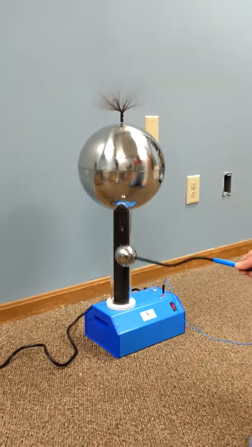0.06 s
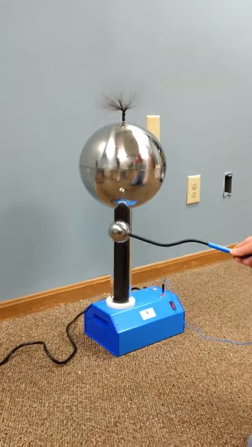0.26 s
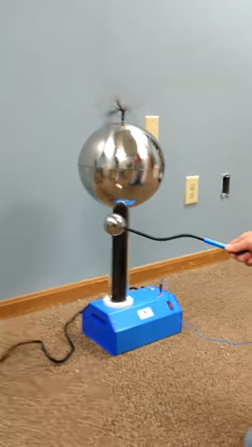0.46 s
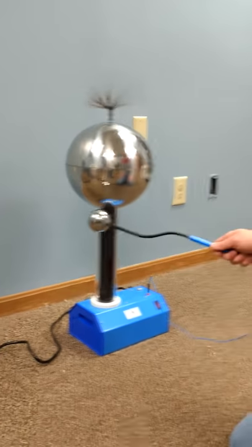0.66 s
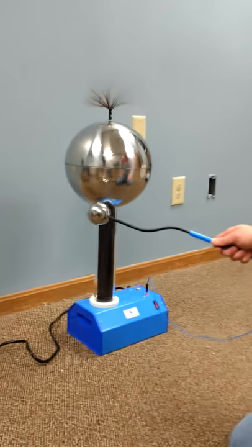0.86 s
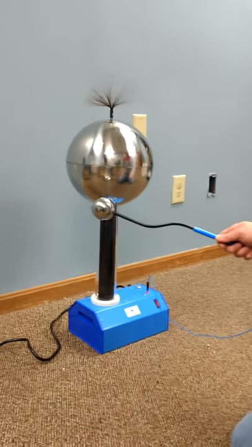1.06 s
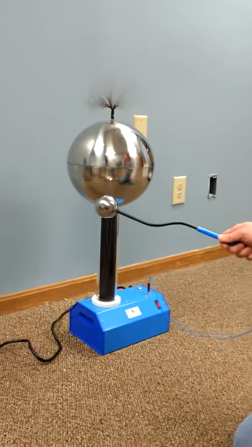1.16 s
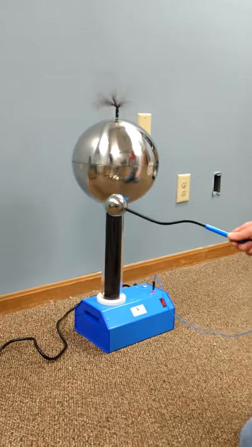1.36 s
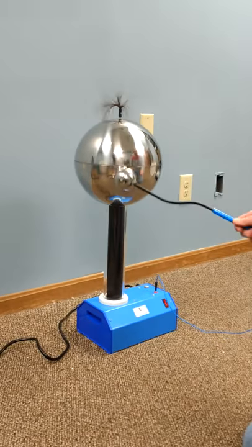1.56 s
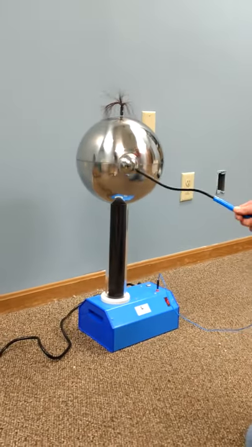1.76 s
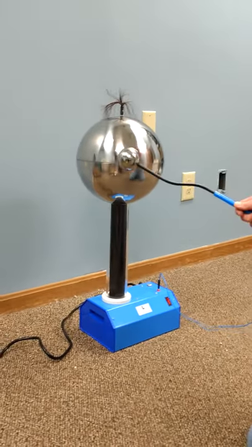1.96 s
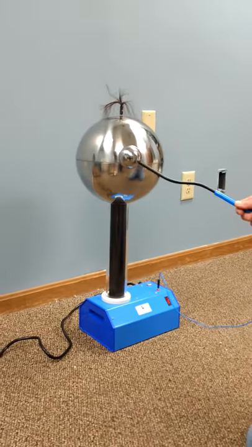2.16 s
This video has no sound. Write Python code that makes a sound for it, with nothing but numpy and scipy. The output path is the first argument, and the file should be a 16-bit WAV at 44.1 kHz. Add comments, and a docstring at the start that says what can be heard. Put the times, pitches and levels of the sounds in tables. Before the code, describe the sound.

Static sparks snap from a humming generator, then quicken into a faint crackle.

```python
"""A belt-driven static generator hums in a small carpeted room; leaking charge hisses.
From 0.2 s a wand draws sparks from its metal sphere, each a pressure spike with echoes and a tail.
Three snaps overload a microphone port and thump; the gain control ducks and slowly recovers.
As the wand closes in, the snaps come faster and fainter until, from 1.8 s, it taps the sphere."""
import sys
import numpy as np
from scipy import signal
from scipy.fft import rfft, irfft
from scipy.io import wavfile
from scipy.ndimage import uniform_filter1d, map_coordinates

SR = 44100
rng = np.random.default_rng(int(sys.argv[2]) if len(sys.argv) > 2 else 0)


def generate_wav(sig):
    """Save sig (samples, or channels by samples) to the path in sys.argv[1] as 16-bit PCM at SR."""
    pcm = np.round(np.clip(np.atleast_2d(sig).T, -1, 1) * 32767).astype(np.int16)
    wavfile.write(sys.argv[1], SR, pcm)


N = 97020
T = np.arange(N) / SR
HZ = np.maximum(np.arange(N // 2 + 1) * SR / N, 1)
PORT_LAG_S = 20 / SR
SHELF_LOW_HZ, SHELF_HIGH_HZ = 45.5, 658

# Table levels are relative.
# motor lines (frequency [Hz], level [dB])
MOTOR_LINES = [(118.4, -88.5), (177.6, -72), (204.6, -77.5), (236.9, -74), (296.1, -78.5), (355.3, -71),
               (706, -72.5), (839.8, -73), (940, -75.5), (1050, -89), (1140, -83), (1312, -72)]
# belt and roller noise (frequency [Hz], density [dB])
BELT_SPECTRUM = [(30, -43), (60, -7.5), (110, -15.5), (200, -3.5), (330, -2), (460, -12), (750, 0),
                 (1300, 1.5), (1700, -2), (2200, -5), (3300, -6.5), (4400, -14.5), (6000, -12.5),
                 (8000, -22.5), (15000, -32)]
# motor and belt envelope (time [s], level [dB])
MACHINE_LEVEL = [(0, -2), (.2, 1.5), (.5, 1), (1.0, -1), (1.4, -3.5), (1.75, -4.5), (2.0, 0.5), (2.2, -0.5)]
# corona envelope (time [s], level [dB])
CORONA_LEVEL = [(0, -64), (.2, -65), (.3, -60.5), (.6, -67), (.95, -65.5), (1.3, -72), (1.7, -67.5),
                (2.05, -86), (2.2, -86)]
# corona hiss (frequency [Hz], density [dB])
CORONA_SPECTRUM = [(2000, 6), (6000, -16.5), (12000, -0.5), (16000, 4)]
# discharges (time [s], strength [dB], room tail [dB])
SPARK_EVENTS = [(.2048, 2, -8), (.4270, -37, -6), (.4510, -4.5, -0.5), (.9595, -7.5, 0), (1.1806, -11, 1),
                (1.3750, -9.5, -1.5), (1.4732, -10.5, 2.5), (1.5684, -11, 1.5), (1.6433, -13.5, -2),
                (1.6871, -21, 2), (1.7127, -31, 7), (1.8068, -37, 0), (1.8208, -34.5, 0), (1.8381, -32, 1),
                (1.8567, -32.5, 0), (1.8761, -31, -0.5), (1.8964, -31, -4), (1.9200, -29.5, 3.5),
                (1.9526, -25, -1), (1.9873, -23.5, 2), (2.0119, -30, 3), (2.0400, -26.5, 9)]
# sphere, wall and floor echoes (delay [s], level [dB], extra delay at right port [s])
NEAR_ECHOES = [(.00115, -15, .00005), (.0024, -5.5, .00003), (.00305, -12.5, .00005), (.0081, -37, 0.074)]
# scatter off the machine (frequency [Hz], density [dB])
SCATTER_SPECTRUM = [(300, -10), (1200, -7.5), (2100, 2.5), (3100, 0.5), (4500, 5.5), (5300, 6.5),
                    (6000, 11), (7000, -6), (11000, 8), (15500, 7)]
# room tail (frequency [Hz], density [dB])
ROOM_SPECTRUM = [(300, 5), (1000, -4), (2000, 0), (3200, 1), (5500, 1), (8000, 0.5), (12000, 1), (15500, 1)]
# overloads per port (time [s], level [dB], low-pass [Hz], recovery high-pass [Hz])
LEFT_OVERLOADS = [(1.4811, 2.5, 1760, 73)]
RIGHT_OVERLOADS = [(.2049, 12.5, 2400, 45.3), (.2078, -2, 2840, 38.7), (.4534, -3, 4150, 54.5)]
# wand on sphere (time [s], level [dB])
WAND_TAPS = [(1.819, -55.5), (2.0385, -44), (2.041, -56), (2.133, -54.5)]
# wand ring (frequency [Hz], level [dB], T60 [s])
WAND_MODES = [(798, -10.5, 0.11), (1026, -4.5, 0.036), (1288, 2, 0.028), (1720, -2.5, 0.039),
              (2560, -3, 0.042), (3280, -12, 0.039)]
# subtracted share of the other port (frequency [Hz], gain [dB])
CROSS_FEED_RESPONSE = [(60, -2), (400, -4.5), (2200, -0.3), (4400, -5), (8000, -6), (12000, -7.5),
                       (16000, -20)]


def from_db(db):
    """Decibels to gain."""
    return 10 ** (np.asarray(db) / 20)


def envelope(rows):
    """Gain over T from (time [s], level [dB])."""
    return from_db(np.interp(T, *np.transpose(rows)))


def response(rows):
    """Gain over HZ from (frequency [Hz], level [dB])."""
    hz, db = np.transpose(rows)
    return from_db(np.interp(np.log(HZ), np.log(hz), db))


def cut(x, hz, kind, order=1):
    """Butterworth low- or high-pass."""
    sos = signal.butter(order, np.clip(hz, 10, .45 * SR), kind, fs=SR, output="sos")
    return signal.sosfilt(sos, x + 1e-18)


def click(time_s):
    """Unit impulse."""
    return (np.arange(N) == int(round(time_s * SR))) * 1.0


def drift(rate_hz):
    """Smooth random curve, spread near 1."""
    knots = rng.standard_normal(200)
    return map_coordinates(knots, [T * rate_hz + 2], order=3, mode="wrap")


def diffuse(spectrum):
    """Noise from all sides at two ports, coherent in the bass only; rms 1."""
    coherence = np.sinc(2 * HZ * PORT_LAG_S)
    mid, side = rfft(rng.standard_normal((2, N))) * response(spectrum)
    x = irfft(np.sqrt(1 + coherence) * mid + np.sqrt(1 - coherence) * side * [[1], [-1]], N)
    return x / x.std()


def noise_tail(spectrum, t60_s, build_s):
    """Decaying diffuse noise, unit energy."""
    shape = from_db(-60 * T / t60_s) * (1 - np.exp(-T / build_s))
    return diffuse(spectrum) * shape / np.sqrt(np.sum(shape ** 2))


def machine(hum_db=-2.5, waver_db=2.5, speed_wander=.006, belt_db=-59):
    """Wavering motor lines over the rush of the belt."""
    motor_time_s = np.cumsum(1 + speed_wander * drift(rate_hz=9)) / SR
    hum = 0
    for hz, db in MOTOR_LINES:
        amplitude = np.sqrt(2) * from_db(db + hum_db + waver_db * drift(rate_hz=22))
        hum += amplitude * np.sin(2 * np.pi * (hz * motor_time_s + rng.random()))
    return envelope(MACHINE_LEVEL) * (hum + from_db(belt_db) * diffuse(BELT_SPECTRUM))


def corona():
    """Hiss of leaking charge."""
    return envelope(CORONA_LEVEL) * diffuse(CORONA_SPECTRUM)


def sparks(spike_db=2, scatter_db=4, room_db=1.5, full_db=3.5, db_per_octave=10, variants=7):
    """One pressure spike per spark, then near echoes, scatter off the machine and room tail."""
    echoes = sum(from_db(db) * np.array([click(delay_s), click(delay_s + lag_s)])
                 for delay_s, db, lag_s in NEAR_ECHOES)
    near = from_db(spike_db) * click(0) + echoes
    scatters = [noise_tail(SCATTER_SPECTRUM, t60_s=.021, build_s=.00095) for _ in range(variants)]
    tails = [noise_tail(ROOM_SPECTRUM, t60_s=.2, build_s=.0027) for _ in range(variants)]
    out = np.zeros((2, N))
    for k, (time_s, db, tail_db) in enumerate(SPARK_EVENTS):
        start = int(time_s * SR)
        length = min(SR // 2, N - start)
        scatter = from_db(scatter_db) * scatters[k % variants]
        tail = from_db(room_db + tail_db) * tails[k % variants]
        snap = (near + scatter + tail)[:, :length]
        # weaker sparks are shorter: less bass
        thin_hz = 610 * 2 ** (max(full_db - db, 0) / db_per_octave)
        snap = cut(snap, thin_hz, "high")
        out[:, start:start + length] += from_db(db) * cut(snap, hz=367, kind="high", order=2)
    return out


def thumps(overloads, swing_hz=51, swing_q=1.16):
    """An overloaded port jumps off its rest level and swings back ever more slowly."""
    jumps = 0
    for time_s, db, dull_hz, recovery_hz in overloads:
        pulse = cut(click(time_s), dull_hz, "low", order=2)
        jumps += from_db(db) * cut(pulse, recovery_hz, "high", order=2)
    offset = signal.lfilter([1], [1, -np.exp(-2 * np.pi * SHELF_HIGH_HZ / SR)], jumps)
    swing = signal.iirpeak(swing_hz, swing_q, fs=SR)[1]
    return signal.lfilter(swing[::-1], swing, offset)   # all-pass: bass lags


def wand_taps():
    """The wand's ball knocks lightly on the sphere and rings."""
    hits = sum(from_db(db) * click(time_s) for time_s, db in WAND_TAPS)
    ring = sum(from_db(db - 60 * T / t60_s) * np.sin(2 * np.pi * hz * T) for hz, db, t60_s in WAND_MODES)
    return cut(signal.fftconvolve(hits, ring)[:N], hz=566, kind="high", order=2)


def scene(left_db=2, left_top_hz=4170):
    """Pressure at two ports; the left faces away and is duller."""
    left, right = sparks() + wand_taps() + machine() + corona()
    pole = np.exp(-2 * np.pi * left_top_hz / SR)
    left = from_db(left_db) * signal.lfilter([1 - pole], [1, -pole], left)
    return np.array([left + thumps(LEFT_OVERLOADS), right + thumps(RIGHT_OVERLOADS)])


def gain_control(x, limit_db=-10, release_db_per_s=14, window_s=.0023):
    """The louder side ducks both; fast attack, slow release."""
    window = int(window_s * SR)
    power = np.abs(uniform_filter1d(x ** 2, window, axis=1)).max(axis=0)
    over_db = np.maximum(10 * np.log10(power + 1e-12) - limit_db, 0)
    release_db = release_db_per_s * T
    held_db = np.maximum.accumulate(over_db + release_db) - release_db
    ahead_db = np.interp(T + window_s / 2, T, held_db)
    return x * from_db(-uniform_filter1d(ahead_db, window))


def record(dry, top_hz=17000):
    """Each side subtracts the other port, delayed; then bass shelf, gain control, clip, top cut."""
    delay = np.exp(-2j * np.pi * HZ * PORT_LAG_S)
    other = irfft(rfft(dry[::-1]) * response(CROSS_FEED_RESPONSE) * delay, N)
    zero, pole = np.exp(-2 * np.pi * np.array([SHELF_HIGH_HZ, SHELF_LOW_HZ]) / SR)
    lifted = signal.lfilter([1, -zero], [1, -pole], dry - other)
    clipped = np.clip(gain_control(lifted), -.85, .85)
    return signal.sosfilt(signal.cheby2(16, 70, top_hz, fs=SR, output="sos"), clipped)


dry = scene()
out = record(dry)
generate_wav(out)
```